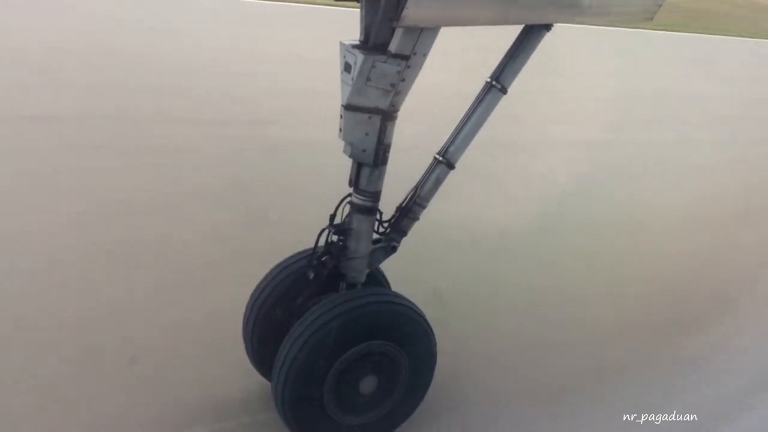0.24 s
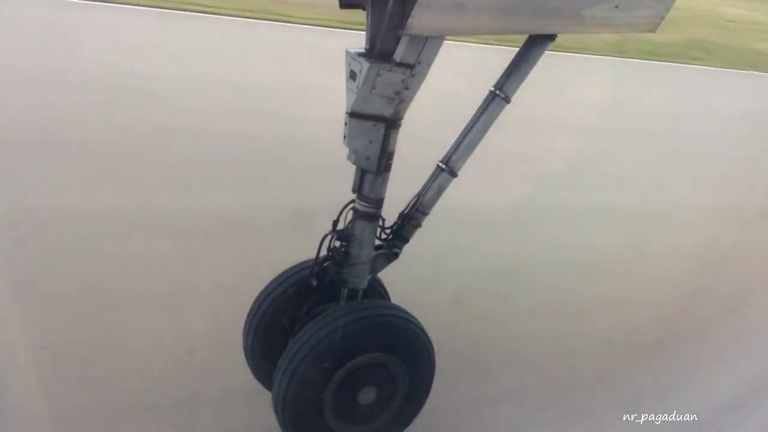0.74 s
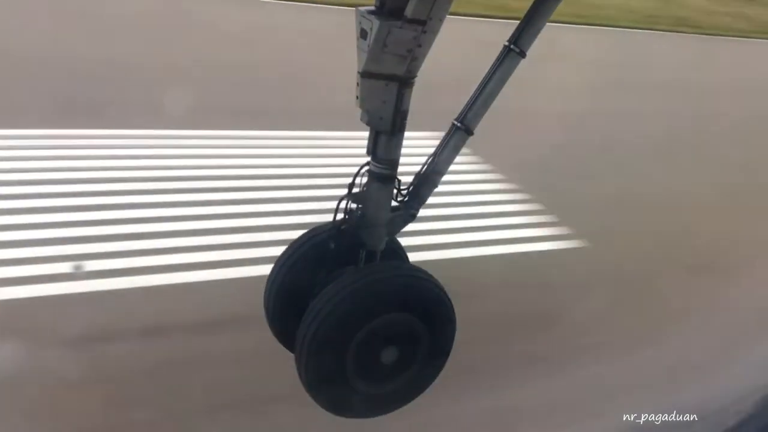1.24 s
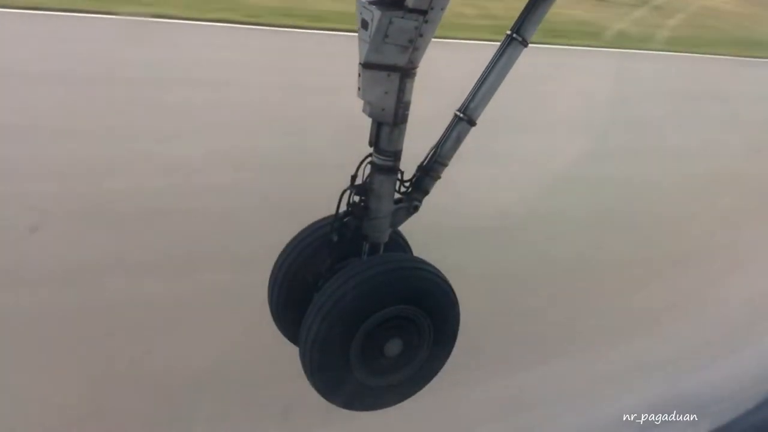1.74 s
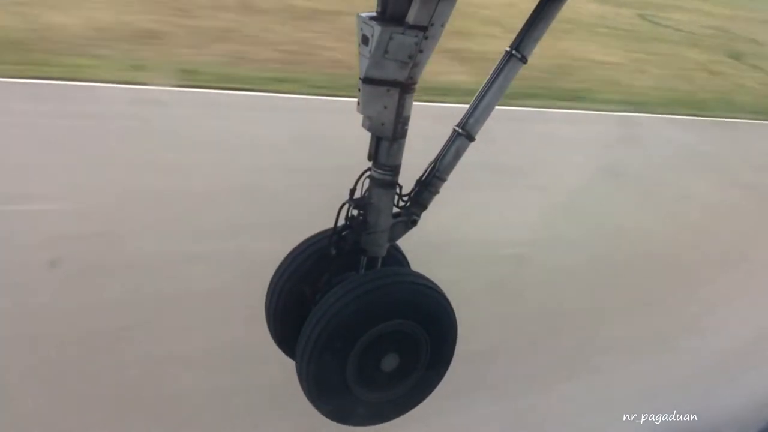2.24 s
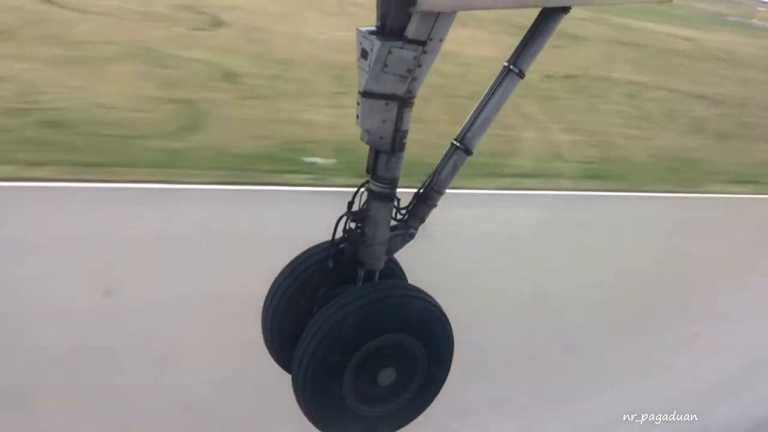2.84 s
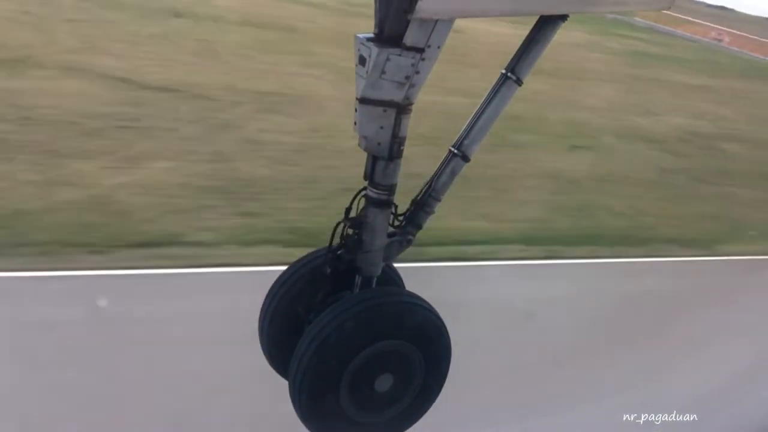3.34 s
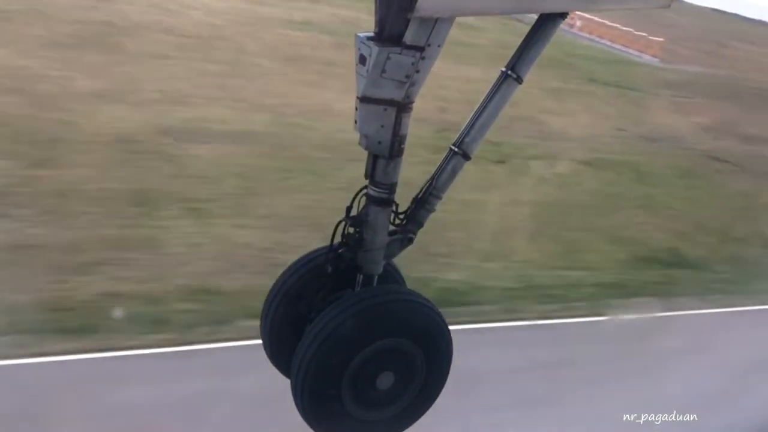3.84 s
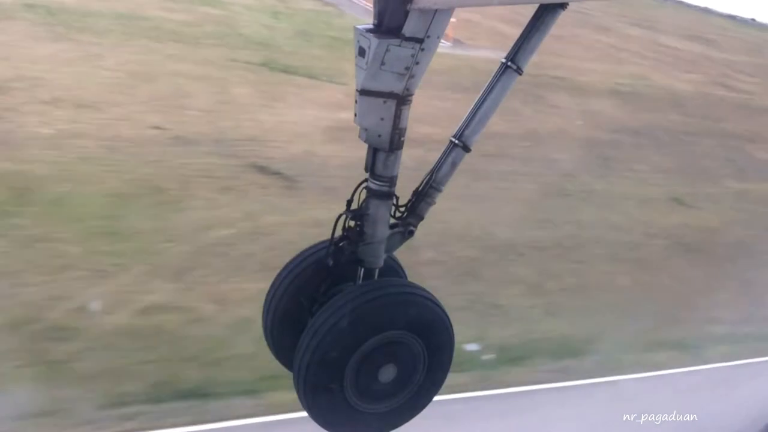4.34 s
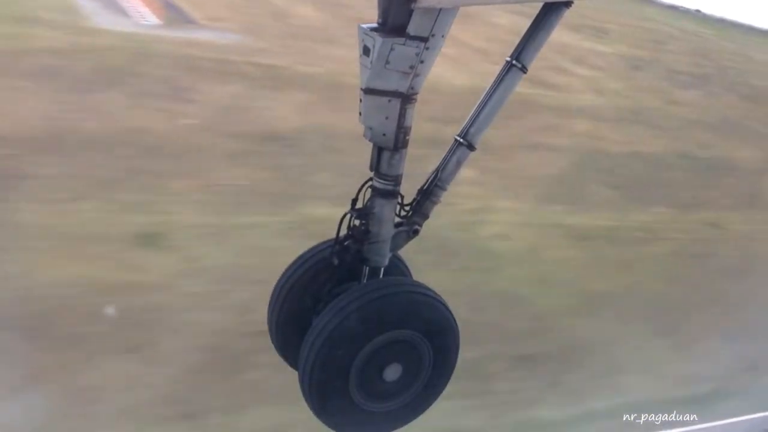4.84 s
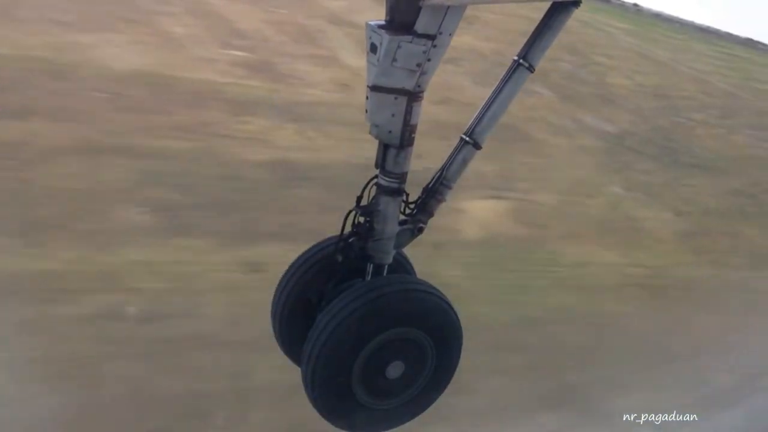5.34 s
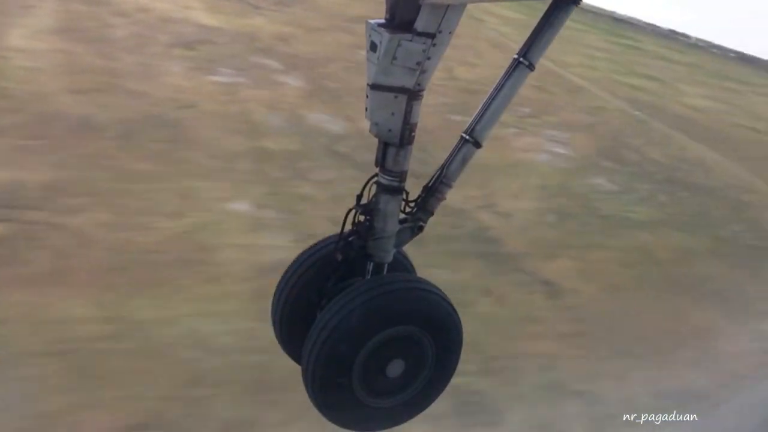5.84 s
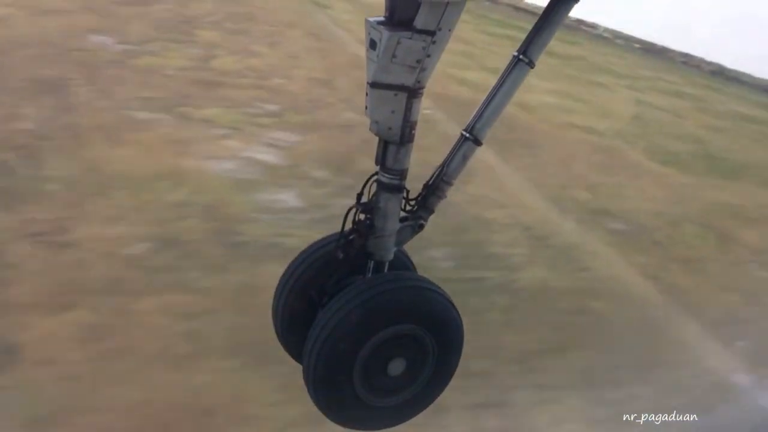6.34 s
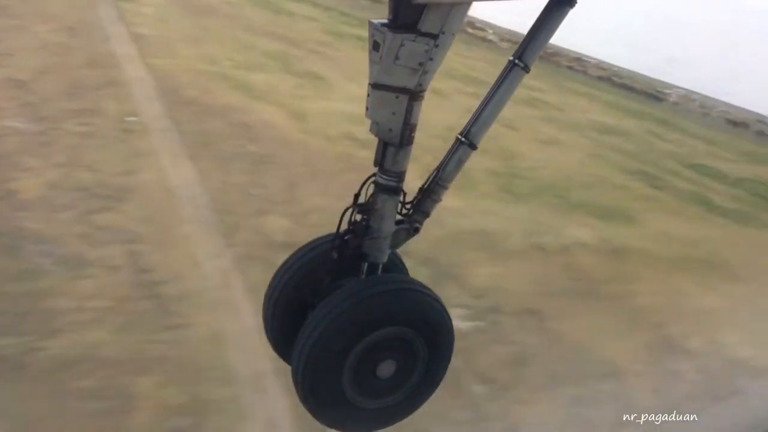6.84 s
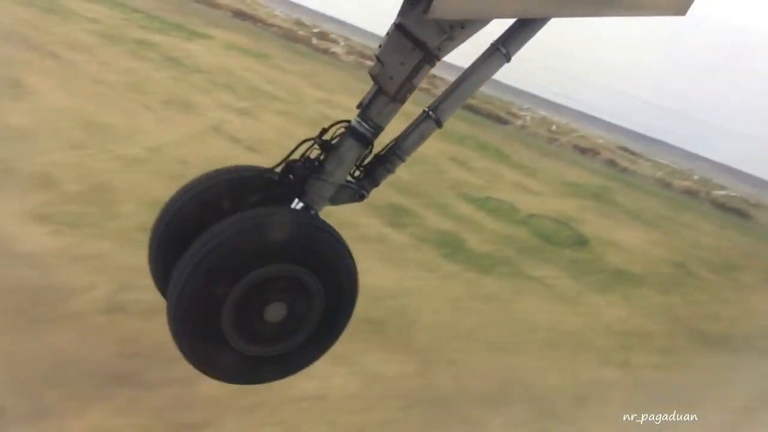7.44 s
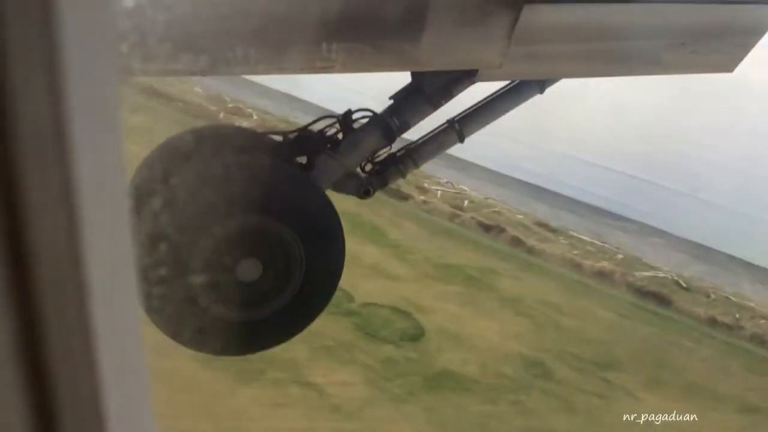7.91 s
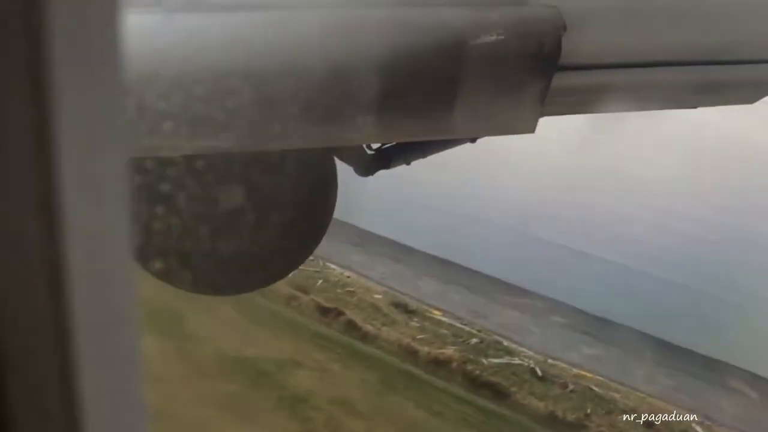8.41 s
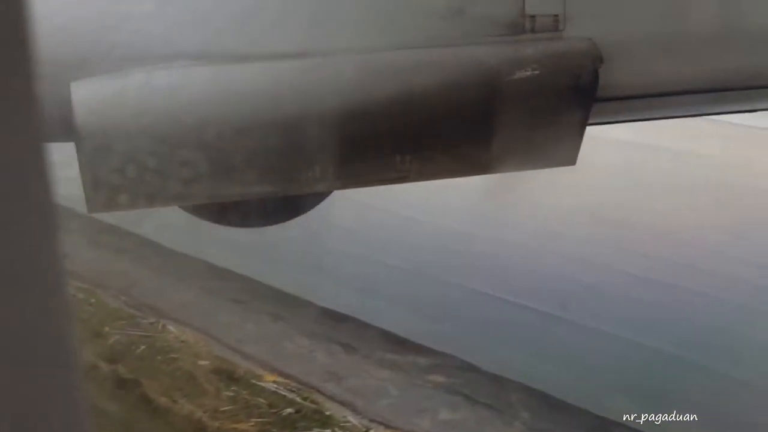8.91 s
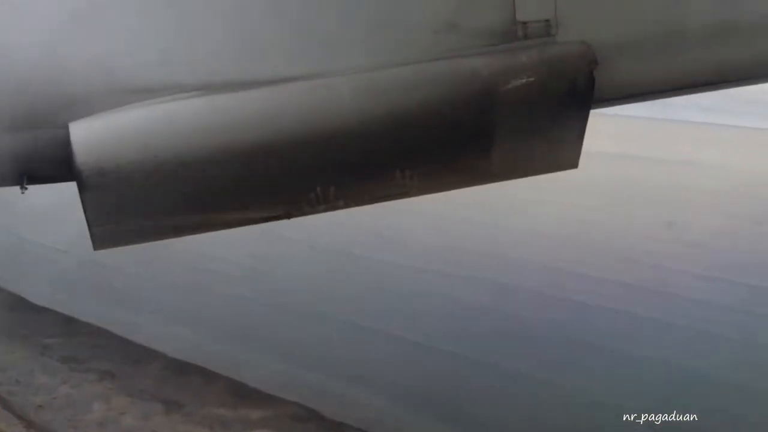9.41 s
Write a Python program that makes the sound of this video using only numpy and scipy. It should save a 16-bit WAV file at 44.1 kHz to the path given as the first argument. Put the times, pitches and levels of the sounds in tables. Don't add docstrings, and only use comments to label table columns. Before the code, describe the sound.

Inside a twin turboprop lifting off, a phone by the window hears a strong, deep propeller drone that slowly throbs, then beats faster as the ground drops away. Muffled air rumbles and faintly hisses. Two soft low thumps come early, a sharp trim tick near the middle. The drone then weakens and a hydraulic pump groans as the gear folds, straining lower and stopping just before the end.

```python
import sys
import numpy as np
from scipy import signal
from scipy.fft import rfft, irfft, next_fast_len
from scipy.io import wavfile
from scipy.ndimage import uniform_filter1d, minimum_filter1d

SR = 44100
rng = np.random.default_rng(int(sys.argv[2]) if len(sys.argv) > 2 else 0)


def gain_from_db(level_db):
    decades = np.asarray(level_db, float) / 20
    return 10 ** decades


def unload_audio(sound):
    columns = np.transpose(np.atleast_2d(sound))
    steps = np.round(np.clip(columns, -1, 1) * 32767)
    wavfile.write(sys.argv[1], SR, steps.astype(np.int16))


N = 426447


def rms_one(x):
    return x / np.sqrt(np.mean(x ** 2) + 1e-20)


def in_time(rows):
    seconds, *columns = np.transpose(rows)
    return [np.interp(np.arange(N) / SR, seconds, column) for column in columns]


def at_hz(points, hz):
    table = np.array(points)
    return np.interp(np.log(hz + 1e-9), np.log(table[:, 0]), table[:, 1], left=-120, right=-120)


def drift(rate_hz):
    r = np.exp(-80 * np.pi * rate_hz / SR)
    noise = rng.standard_normal(N // 40 + 2002)
    slow = signal.lfilter([1], [1, -2 * r, r * r], noise)[2000:]
    return np.interp(np.arange(N) / 40, np.arange(len(slow)), rms_one(slow))


def swell(t, middle_s, half_s):
    return np.exp(-((t - middle_s) / half_s) ** 2)


def ring(clicks, hz, t60):
    r, w = gain_from_db(-60 / (t60 * SR)), 2 * np.pi * hz / SR
    return signal.lfilter([0, np.sin(w)], [1, -2 * r * np.cos(w), r * r], clicks + 1e-18)


def coloured(spectrum, band_hz, gust_db, gust_hz):
    size = next_fast_len(N)
    hz = np.fft.rfftfreq(size, 1 / SR)
    gain = gain_from_db(at_hz(spectrum, hz))
    in_band = (hz > band_hz[0]) & (hz < band_hz[1])
    share = np.sum(gain[in_band] ** 2) / np.sum(gain ** 2)
    noise = rms_one(irfft(rfft(rng.standard_normal(size)) * gain, size)[:N])
    return noise / np.sqrt(share) * gain_from_db(gust_db * drift(gust_hz))


# time in seconds, blade tone in dB, second multiple in dB.
BLADE_LEVELS = [(0, -11, -32.5), (.6, -9, -40.5), (1.2, -9, -31.5), (1.7, -9.5, -29), (2.1, -7.5, -33.5),
                (2.6, -9.5, -33), (3.2, -9.5, -32), (4.2, -10.5, -27.5), (5.0, -12, -32.5),
                (6.25, -12.5, -31.5), (6.45, -15, -40), (6.9, -16, -38.5), (7.4, -16.5, -27.5),
                (8.4, -18.5, -26.5), (8.52, -18, -30.5), (8.85, -17.5, -24.5), (9.4, -17, -28.5),
                (9.67, -18, -31)]
# time in seconds, level in dB.
THIRD_LEVEL = [(0, -45), (.6, -40), (1.0, -47), (2.2, -44), (3.0, -37.5), (6.0, -34.5), (9.67, -32)]
# multiple of the blade tone, level in dB.
HIGH_MULTIPLES = [(4, -53.5), (5, -59), (6, -60), (7, -61), (10, -72), (12, -67), (14, -74.5)]
# pitch in Hz, level in dB, growth in dB per second.
ENGINE_WHINES = [(964.5, -70, .8), (7251, -94, .4), (9394, -94, 0.01)]
# middle in seconds, change in dB, half length in seconds.
PHONE_SHIFTS = [
    (1.7, -6, 0.095),
    (5.49, -3, 0.04),
    (8.73, -6.5, .05),
]
# time in seconds, growth of the echo path in m/s, echo level in dB against the direct tone.
CLIMB_ECHO = [(0.0, 0.73, -18.0), (1.0, 2.18, -9.3), (1.7, 3.3, -19.4), (2.4, 6.23, -20.1),
              (3.4, 8.85, -7.6), (4.5, 11.98, -9.1), (6.0, 15.94, -13.1), (7.2, 19.19, -15.3),
              (8.2, 17.12, -12.9), (9.67, 22.38, -28.4)]


def propellers():
    blade_hz, sound_m_s, start_path_m = 102.05, 343, 3.13
    t = np.arange(N) / SR
    growth_m_s, echo_db = in_time(CLIMB_ECHO)
    path_m = start_path_m + np.cumsum(growth_m_s) / SR
    per_m = 2 * np.pi * blade_hz / sound_m_s
    turn = 2 * np.pi * (blade_hz * t + .43)
    tone_db, second_db = in_time(BLADE_LEVELS)
    for s, change_db, half_s in PHONE_SHIFTS:
        tone_db = tone_db + change_db * swell(t, s, half_s)

    echo = gain_from_db(echo_db) * np.sin(turn - per_m * path_m)
    bounce_db = -17.2 - ((t - 2.28) / .33) ** 2
    echo += gain_from_db(bounce_db) * np.sin(turn - per_m * (2 * path_m + 1.26))
    out = gain_from_db(tone_db) * (np.sin(turn) + echo)

    runway_ends_s, grass_db_per_s = 2.56, 25.4
    runway = gain_from_db(-4.15 - grass_db_per_s * np.maximum(t - runway_ends_s, 0))
    twice = 2 * turn + .2 * drift(4.0)
    pair = np.sin(twice) + runway * np.sin(twice - 2 * per_m * (path_m + .247))
    out += gain_from_db(second_db + 0.56 * drift(2.2)) * pair

    third_db = in_time(THIRD_LEVEL)[0] + 2.0 * drift(2.5)
    out += gain_from_db(third_db) * np.sin(3 * turn + .2 * drift(4.0) + 1)
    waver = 0.051 * drift(1.3)
    for multiple, level_db in HIGH_MULTIPLES:
        out += gain_from_db(level_db + 2.5 * drift(1.4)) * np.sin(multiple * (turn + waver))
    for hz, level_db, growth_db in ENGINE_WHINES:
        whine_db = level_db + growth_db * t + 1.5 * drift(1.8)
        out += gain_from_db(whine_db) * np.sin(2 * np.pi * hz * t + .5 * drift(1.9))
    return np.sqrt(2) * out


# start in seconds, peak in dB, pitch in Hz, ring time in seconds.
GEAR_THUMPS = [
    (.47, -17.5, 68, 0.17),
    (1.72, -19.5, 70.6, 0.17),
]


def thumps():
    out = np.zeros(N)
    for s, peak_db, hz, t60 in GEAR_THUMPS:
        push = np.zeros(N)
        push[round(s * SR)] = 1
        blow = ring(ring(push, hz, t60), hz, t60)
        out += gain_from_db(peak_db) * blow / np.max(abs(blow))
    return out


# time in seconds, piston rate in Hz, level of the third multiple in dB,
# brightness in dB per octave.
PUMP_RUN = [
    (7.19, 204.7, -51, -2),
    (7.27, 230.9, -42, 0.5),
    (7.35, 218.6, -44, -.5),
    (7.46, 229.4, -41, -0.5),
    (8.3, 216, -43, .5),
    (8.64, 198, -45, 0),
    (8.95, 176.6, -45, -6),
    (9.4, 184, -43.5, -2.5),
    (9.5, 169.4, -51, 0),
]
# frequency in Hz, level in dB.
PIPE_COLOUR = [(175, 15), (220, 6.5), (440, 5.5), (540, 2), (700, 1), (900, -6.5), (1030, -8),
               (1160, -14.5), (1350, -12), (1550, -17), (1800, -30.5), (2050, -29), (2400, -32),
               (2700, -32.5), (3300, -44)]


def pump():
    start_s, stop_s = PUMP_RUN[0][0], PUMP_RUN[-1][0]
    on = slice(round(start_s * SR), round(stop_s * SR))
    rate_hz, level_db, bright_db = (curve[on] for curve in in_time(PUMP_RUN))
    t = np.arange(N) / SR
    running = np.clip(np.minimum(t - start_s, stop_s - t) / 0.033, 0, 1)[on]
    turn = 2 * np.pi * np.cumsum(rate_hz * (1 + 0.00083 * drift(7.6)[on])) / SR
    flicker_db = 1.0 + .05 * (rate_hz.max() - rate_hz)
    out = np.zeros(N)
    for k in range(1, 15):
        accent_db = 2.2 * (k % 3 == 0) + bright_db * np.log2(max(k, 3) / 3)
        accent_db = accent_db + flicker_db * np.sqrt(k / 3) * drift(5.0)[on]
        pipe_hz = np.clip(k * rate_hz, PIPE_COLOUR[0][0], PIPE_COLOUR[-1][0])
        tone_db = level_db - 4.5 + at_hz(PIPE_COLOUR, pipe_hz) + accent_db
        out[on] += running * gain_from_db(tone_db) * np.sin(k * turn + k * k)
    return np.sqrt(2) * out


# middle in seconds, peak in dB, half length in seconds.
LOCK_RELEASE = (6.95, -49, .05)
# middle in seconds, peak in dB, half length in seconds.
OIL_SWELL = (8.2, -63.5, 0.65)
# frequency in Hz, level in dB per Hz.
OIL_COLOUR = [(1400, -8), (1700, 0), (2300, -1.5), (2900, -5), (3500, -18)]


def hydraulic_oil():
    t = np.arange(N) / SR
    s, peak_db, half_s = LOCK_RELEASE
    rush_colour = [(500, -10), (750, -2), (1000, -7), (1450, -3), (1650, -21)]
    rush = coloured(rush_colour, (500, 1600), gust_db=1.5, gust_hz=30.0)
    rush = gain_from_db(peak_db) * swell(t, s, half_s) * rush
    s, peak_db, half_s = OIL_SWELL
    flow = coloured(OIL_COLOUR, (1600, 3500), gust_db=1.5, gust_hz=12.0)
    return rush + gain_from_db(peak_db) * swell(t, s, half_s) * flow


# start in seconds, peak in dB, brightness in dB, fading time (60 dB) in seconds.
TRIM_TICKS = [
    (1.6913, -43.5, 5.5, 0.066),
    (1.699, -47.5, 9, .06),
    (4.5538, -53, -2, 0.05),
    (4.7199, -29, -2, 0.065),
    (4.7569, -46, 2.5, 0.046),
]
# pitch in Hz, level in dB, fading time (60 dB) in seconds.
PANEL_MODES = [(1606, 1, 0.0091), (2090, -10.5, .02), (3340, -6.5, .012), (3840, -2, 0.014),
               (4130, -3.5, 0.007), (4910, -8, 0.017), (6180, -14, 0.013), (9440, -8.5, .02)]


def ticks():
    out, crackle, t = np.zeros(N), np.zeros(N), np.arange(N) / SR
    for s, peak_db, bright_db, t60 in TRIM_TICKS:
        since = np.maximum(t - s, 0)
        fade_db = peak_db - 10.5 + bright_db - 60 * since / t60
        crackle += (1 - np.exp(-since / 0.002)) * gain_from_db(fade_db)
    strength_db = rng.normal(0, 2.5, (len(TRIM_TICKS), len(PANEL_MODES)))
    for k, (hz, level_db, t60) in enumerate(PANEL_MODES):
        clicks = np.zeros(N)
        for row, (s, peak_db, bright_db, _) in enumerate(TRIM_TICKS):
            click_db = peak_db + level_db - 6.5 - bright_db + strength_db[row, k]
            clicks[round((s + .0003) * SR)] = gain_from_db(click_db)
        out += ring(clicks, hz, t60)
    out = 0.23 * out + 0.33 * ring(out, 3900, 0.0018)
    for late_s, echo_db in [(.0042, -9.5), (.012, -22.0), (.0165, -18.0)]:
        if late_s == .0042:
            direct, echoes = out, np.zeros(N)
        echoes = echoes + gain_from_db(echo_db) * np.roll(direct, round(late_s * SR))
    out = direct + echoes
    colour = [(1600, -20), (2500, -7.5), (4000, 0), (9000, -2.0), (14500, -5), (16000, -30.5)]
    return out + crackle * coloured(colour, (2500, 14000), gust_db=2.5, gust_hz=150.0)


# start in seconds, end in seconds, first pitch in Hz, last pitch in Hz, level in dB.
TRIM_SQUEAKS = [
    (3.302, 4.247, 3240, 3140, -83),
    (5.182, 5.55, 3150, 2910, -80.5),
    (5.821, 6.285, 3220, 3100, -79),
]


def squeaks():
    out = np.zeros(N)
    for start, end, start_hz, end_hz, level_db in TRIM_SQUEAKS:
        on = slice(round(start * SR), round(end * SR))
        count = on.stop - on.start
        glide = np.sin(2 * np.pi * np.cumsum(np.linspace(start_hz, end_hz, count)) / SR)
        loudness = gain_from_db(level_db + 0.5 + 2.5 * drift(5.0)[on])
        out[on] = loudness * np.sqrt(np.hanning(count)) * glide
    return out


# time in seconds, buffeting along the hull in dB, propeller wash at the window in dB.
AIR_LEVELS = [(0.0, -37.5, -65), (0.24, -36, -65.5), (1.05, -37, -65.5), (1.8, -36, -65.5),
              (1.96, -36, -65), (2.13, -38, -68), (3.9, -38, -68), (4.23, -38, -68), (5.47, -36.5, -67.5),
              (5.84, -37, -68), (7.19, -32.5, -67.5), (7.59, -34.5, -67.5), (8.86, -33.5, -65.5),
              (9.67, -33.5, -66.5)]
# frequency in Hz, level in dB per Hz.
RUMBLE_COLOUR = [(20, -36), (32, -27), (40, -19.5), (50, -10.5), (65, -2), (90, 0), (130, -3), (160, -5),
                 (175, -9), (190, -14), (230, -34)]
ROAR_COLOUR = [(170, -24.5), (205, 1), (228, -2.5), (255, 1), (287, -5), (360, 0.5), (395, -3), (430, -4.5),
               (500, -13), (660, -17.5), (1000, -26), (1450, -30.5), (1650, -42.5), (2200, -58.5)]
WALL_COLOUR = [(1100, -22.5), (1600, 0.5), (2100, 0), (2900, -6.5), (3600, -7), (3820, -6), (4200, -9.5),
               (4900, -10), (5500, -11.5), (7000, -19)]
HISS_COLOUR = [(4500, -19), (6000, -5), (7900, -3), (8150, -0.5), (9000, -1), (9450, -0.5), (9800, -3.5),
               (10600, -5.5), (11200, -8.5), (13000, -21), (16000, -26.5)]
# frequency in Hz, level in dB per Hz.
SEAL_COLOUR = [(10000, -17), (11500, -1), (12300, -0.5), (13300, -4.5), (14300, -3), (15700, -9),
               (16500, -41.5)]
# time in seconds, level in dB.
SEAL_LEAK = [(0, -81), (2, -78.5), (4.5, -80), (7, -77.5), (8.3, -73), (9.67, -75)]
# frequency in Hz, level in dB per Hz.
INTAKE_COLOUR = [(7600, -18), (8200, -1.5), (9500, -0.5), (10600, -1.5), (11300, -19)]


def airflow():
    buffet_db, wash_db = in_time(AIR_LEVELS)
    swing_db = buffet_db - buffet_db.mean()
    rumble = gain_from_db(-31.5 + 1.1 * swing_db) * coloured(RUMBLE_COLOUR, (120, 190), gust_db=1.5, gust_hz=1.6)
    roar = gain_from_db(buffet_db + 1.54) * coloured(ROAR_COLOUR, (320, 480), gust_db=0.73, gust_hz=15.0)
    wall_db = wash_db + 4.5 + 0.15 * swing_db
    wall = gain_from_db(wall_db) * coloured(WALL_COLOUR, (1600, 3500), gust_db=0.35, gust_hz=14.0)
    hiss = gain_from_db(wash_db - 0.9) * coloured(HISS_COLOUR, (6000, 12000), gust_db=1.3, gust_hz=13.0)
    seal_db = in_time(SEAL_LEAK)[0]
    seal = gain_from_db(seal_db) * coloured(SEAL_COLOUR, (11000, 16000), gust_db=0.9, gust_hz=6.0)
    intake_ends_s, intake_fade_s = 2.0, .08
    leaving = .5 - .5 * np.tanh((np.arange(N) / SR - intake_ends_s) / intake_fade_s)
    intake = gain_from_db(-69.5) * leaving * coloured(INTAKE_COLOUR, (6000, 12000), gust_db=0.5, gust_hz=5.0)
    return rumble + roar + wall + hiss + seal + intake


def scene():
    machine = propellers() + thumps() + pump() + hydraulic_oil()
    return (machine + ticks() + squeaks() + airflow())[None, :]


def limiter(x):
    ceiling, hold_s = .7, .03
    span = round(hold_s * SR)
    gain = minimum_filter1d(np.minimum(1, ceiling / (abs(x) + 1e-9)), size=2 * span)
    return x * uniform_filter1d(gain, size=span)


# frequency in Hz, threshold in dB against the usual strength there.
WEAK_LIMIT = [(1000, -40), (2500, -23.5), (4500, -21.5), (6500, -16), (8500, -20.5), (11500, -9.5),
              (12300, -8), (13000, -2), (13700, -0.5), (14200, -9.5), (14800, -1), (16000, 2.5)]
# middle in seconds, length in seconds, thinned above in Hz.
THIN_MOMENTS = [(.066, .04, 3600), (2.086, .04, 3200), (4.315, .04, 4200), (5.105, .04, 4000),
                (6.23, .02, 2400), (6.707, .04, 1700), (7.995, .02, 3200), (8.459, .02, 2200),
                (8.599, .02, 3200), (9.62, .02, 1800)]
THIN_FRAMES_S = [.193, .24, .565, .727, 1.47, 1.888, 1.981, 2.144, 2.956, 3.235, 3.978, 4.373, 4.535, 5.0,
                 5.255, 5.696, 5.905, 6.114]


def phone_thinning(x):
    size, offset = 1024, 325
    n, k = np.arange(2 * size)[:, None], np.arange(size)
    window = np.sin(np.pi * (n + .5) / (2 * size))
    basis = window * np.cos(np.pi / size * (n + .5 + size / 2) * (k + .5))
    lead = 2 * size - offset
    count = (N + lead) // size + 2
    blocks = np.pad(x, (lead, count * size - N - lead)).reshape(count, size)
    lines = np.hstack([blocks[:-1], blocks[1:]]) @ basis
    hz = (k + .5) * SR / (2 * size)
    centre_s = (np.arange(1, count) * size - lead) / SR
    median_power = np.median(lines ** 2, axis=0)
    usual = np.sqrt(uniform_filter1d(median_power, size=24) / 0.68)

    jumps = rng.standard_normal((count - 1, size // 16))
    jumps = signal.lfilter([.8], [1, -.6], jumps, axis=0)
    jump_db = 5.0 + 4 * (hz > 12300)
    limit_db = at_hz(WEAK_LIMIT, hz) + jump_db * np.repeat(jumps, 16, axis=1)

    single = abs(centre_s[:, None] - THIN_FRAMES_S).min(axis=1) < size / SR / 2
    edge_hz = np.where(single, rng.uniform(2800, 4200, count - 1), SR ** 2)
    for s, length_s, above_hz in THIN_MOMENTS:
        edge_hz[abs(centre_s - s) < length_s / 2] = above_hz
    octaves_below = np.maximum(np.log2(edge_hz[:, None] / hz), 0)
    limit_db = np.maximum(limit_db, 10 - 11 * octaves_below)

    strong = abs(lines) > usual * gain_from_db(limit_db)
    boost_db = 3 * (octaves_below < .5)
    kept = (lines * gain_from_db(boost_db) * strong) @ basis.T * 2 / size
    out = np.zeros_like(blocks)
    out[:-1] += kept[:, :size]
    out[1:] += kept[:, size:]
    return out.ravel()[lead:lead + N]


def band_limit(x):
    return signal.sosfilt(signal.butter(12, 15760, fs=SR, output="sos"), x)


def record(dry):
    mix = phone_thinning(limiter(dry[0]))[None, :]
    return band_limit(mix)


dry = scene()
out = record(dry)
unload_audio(out)
```